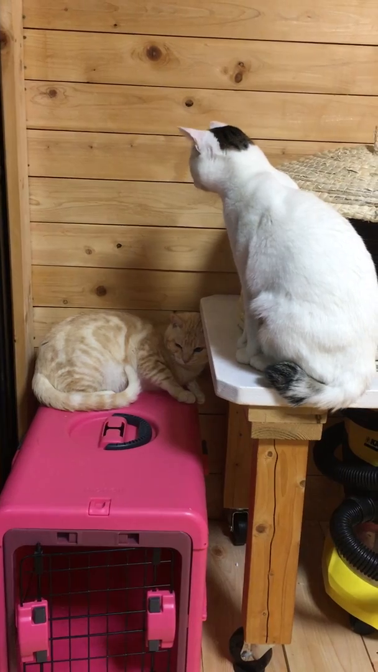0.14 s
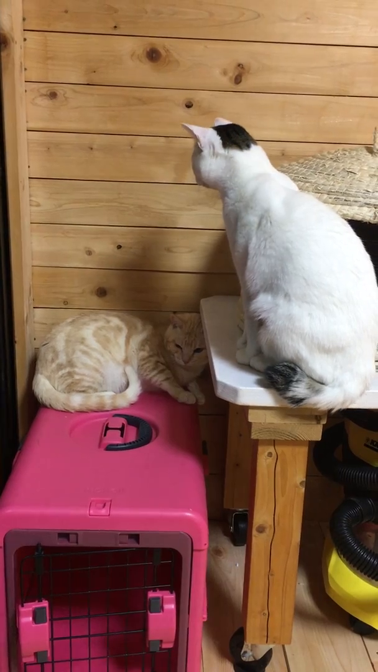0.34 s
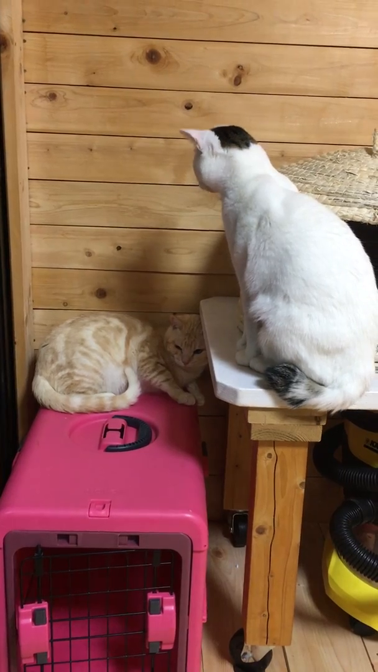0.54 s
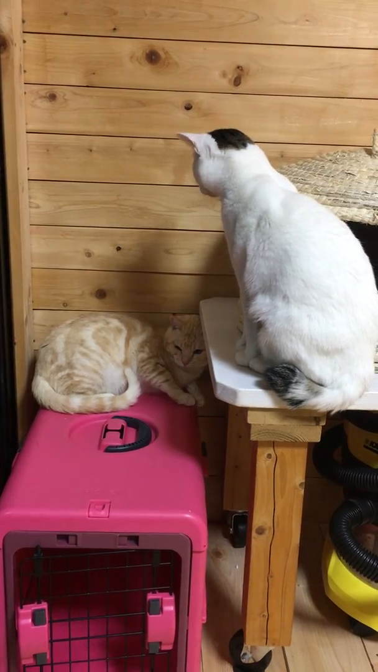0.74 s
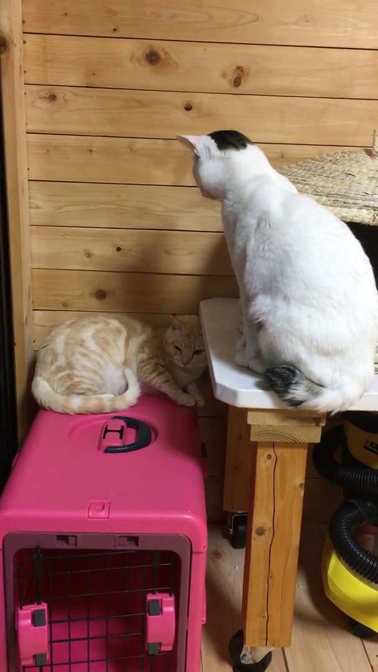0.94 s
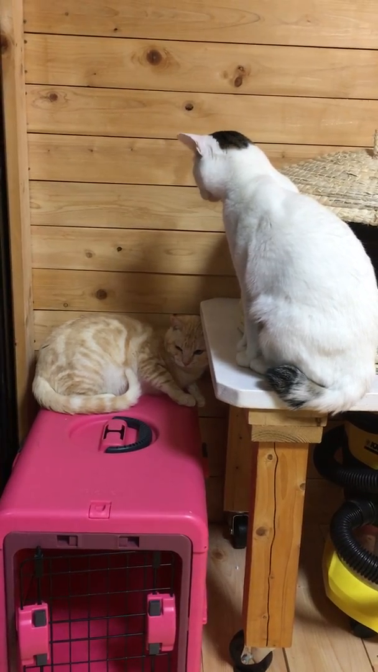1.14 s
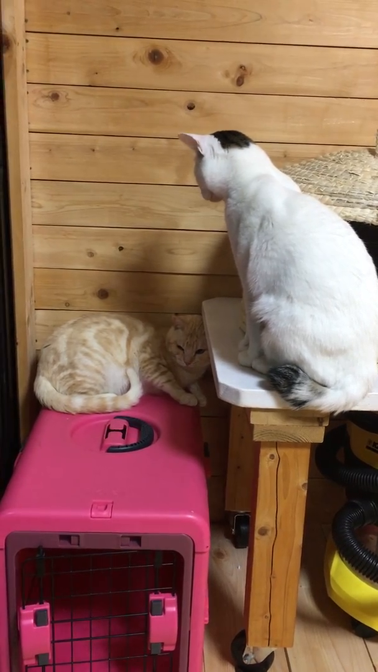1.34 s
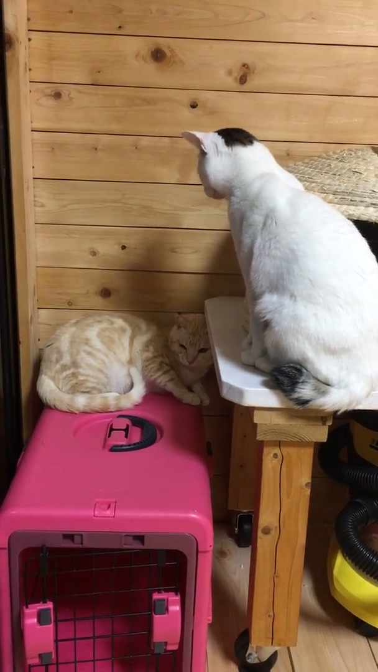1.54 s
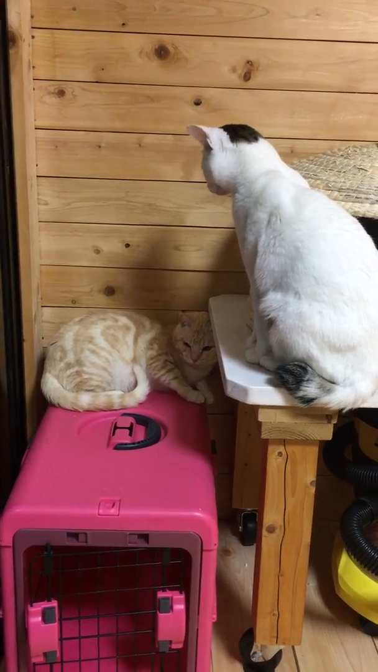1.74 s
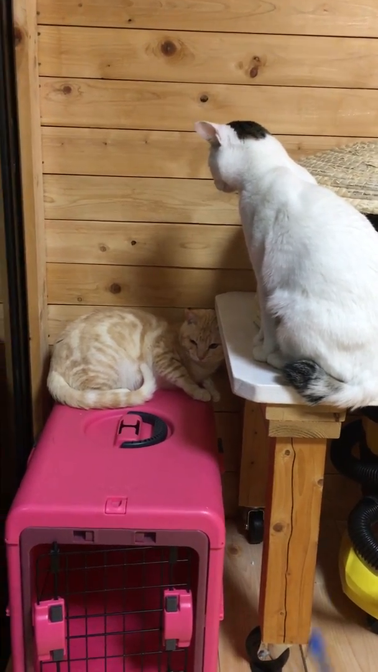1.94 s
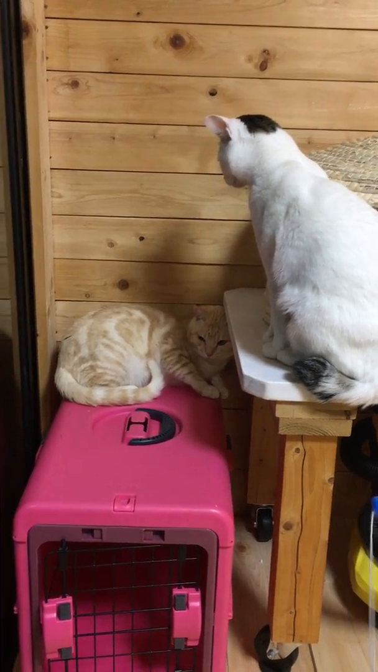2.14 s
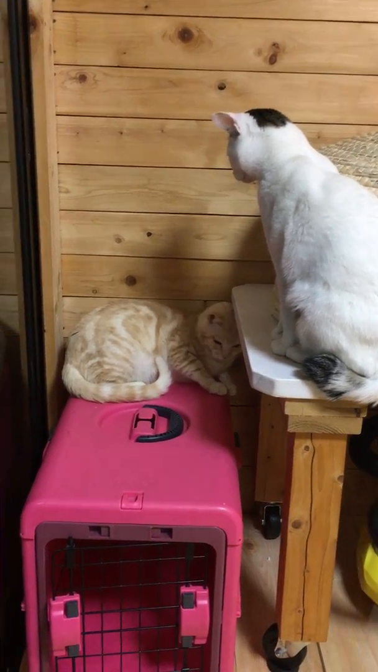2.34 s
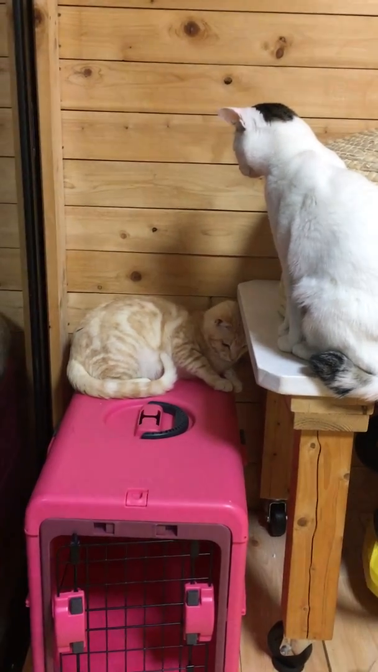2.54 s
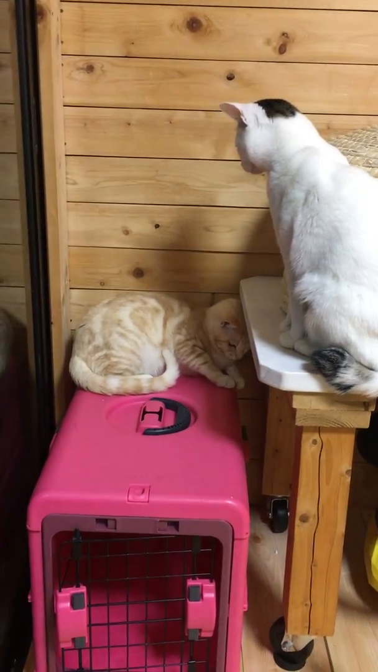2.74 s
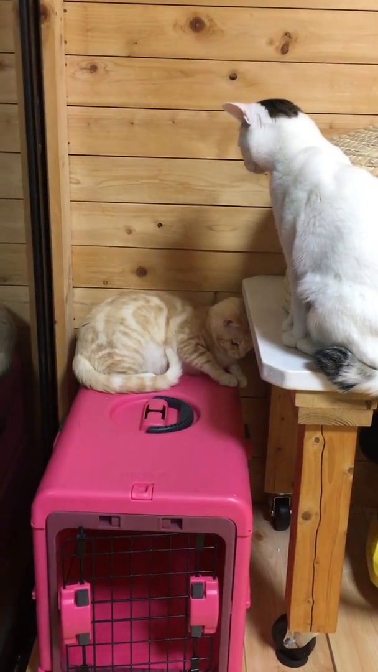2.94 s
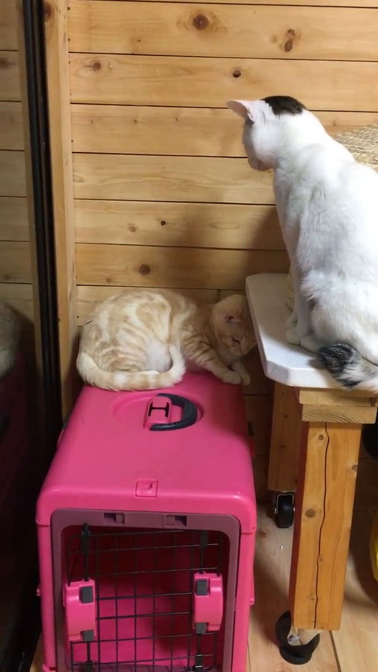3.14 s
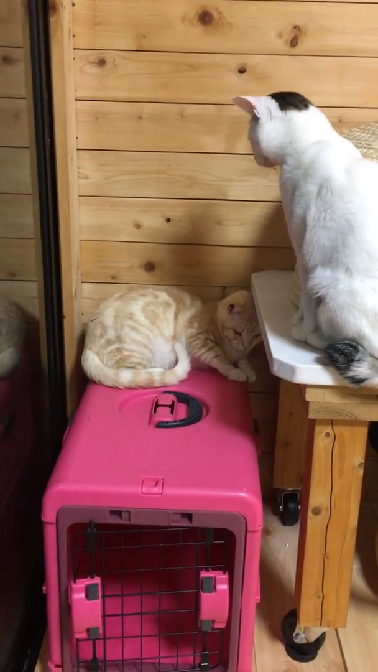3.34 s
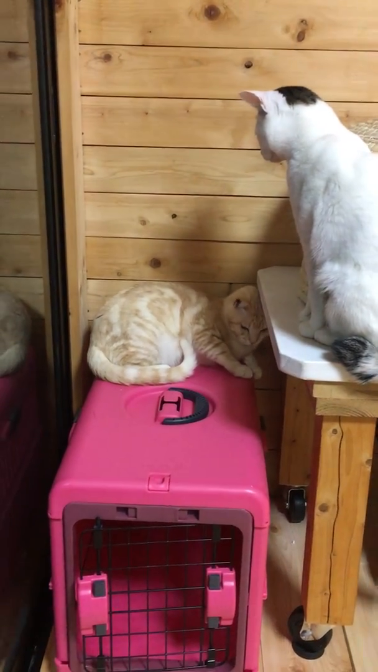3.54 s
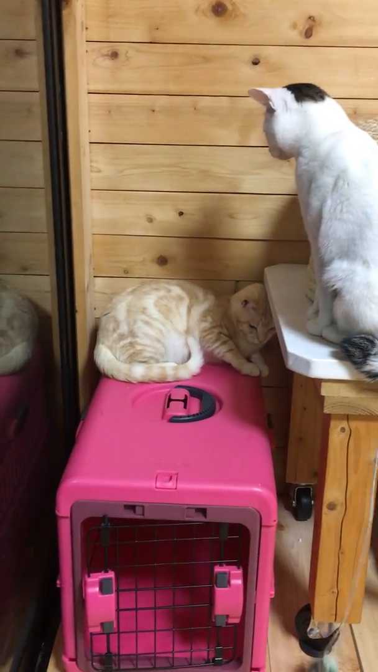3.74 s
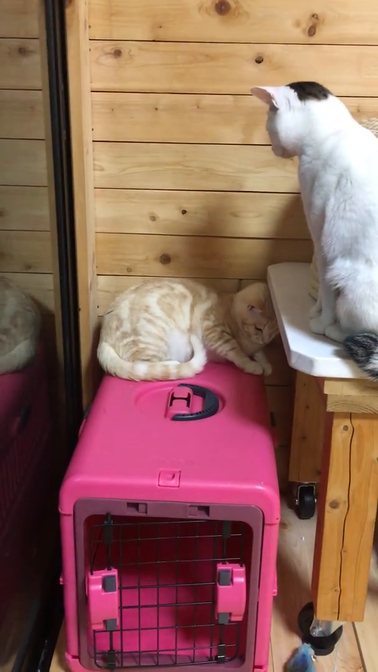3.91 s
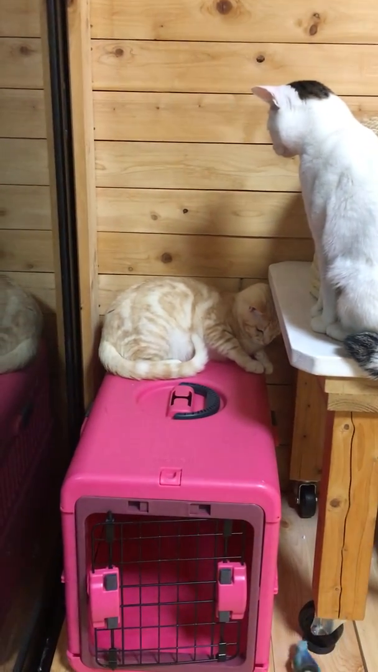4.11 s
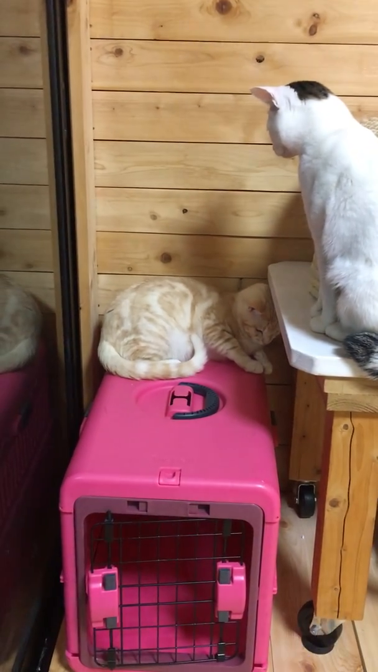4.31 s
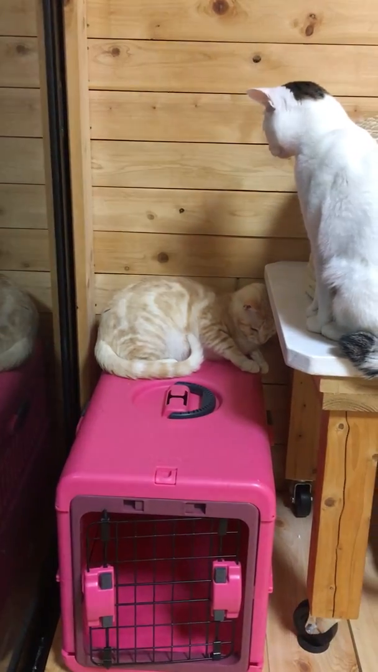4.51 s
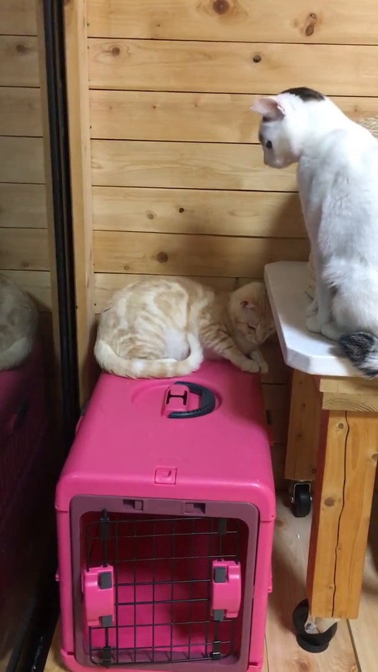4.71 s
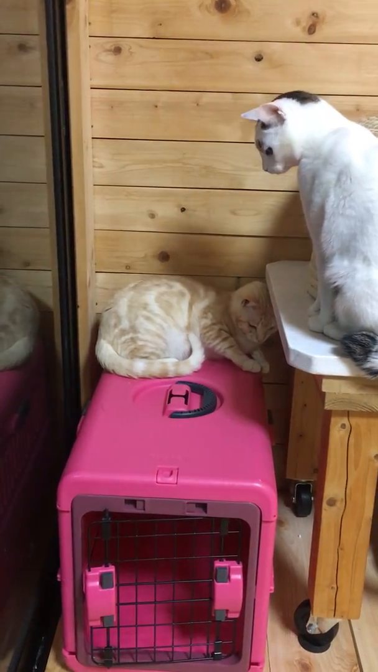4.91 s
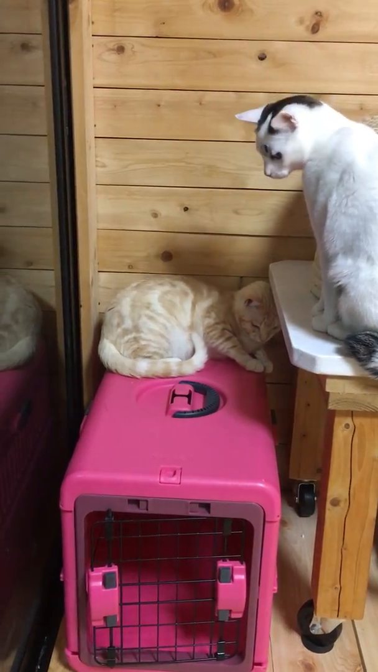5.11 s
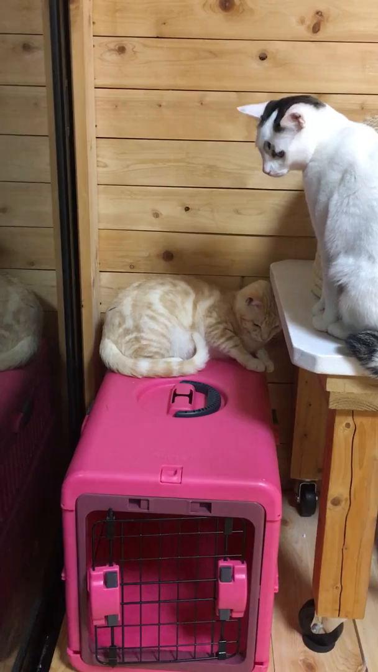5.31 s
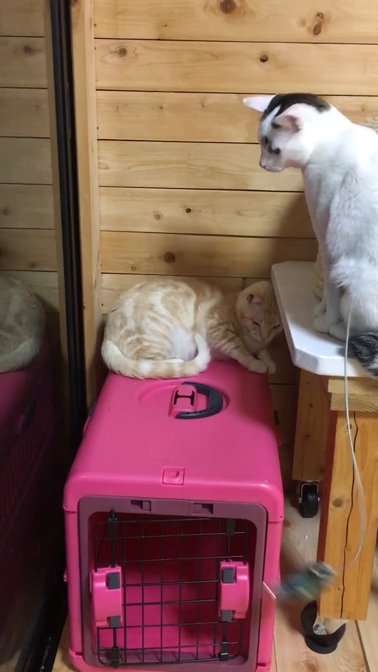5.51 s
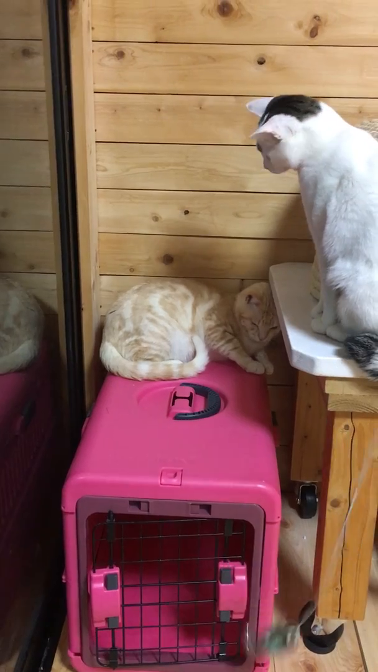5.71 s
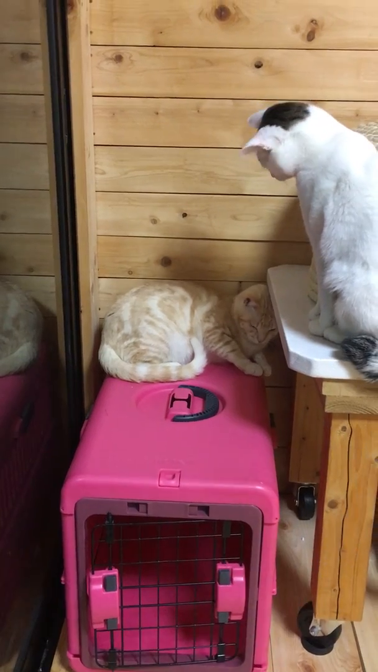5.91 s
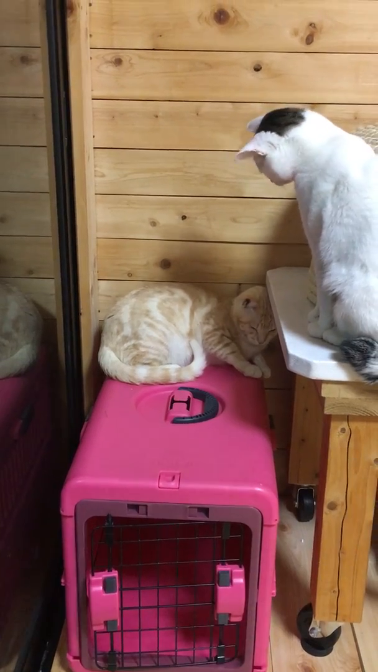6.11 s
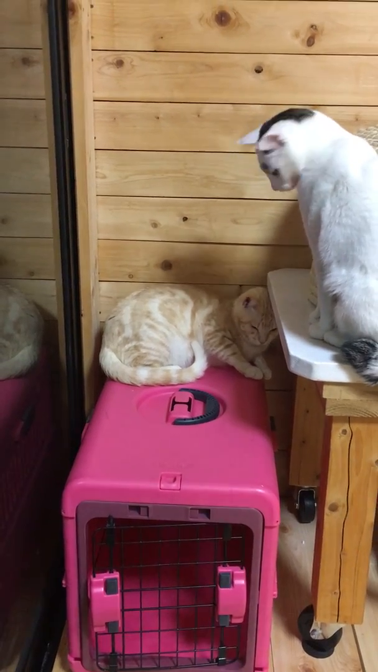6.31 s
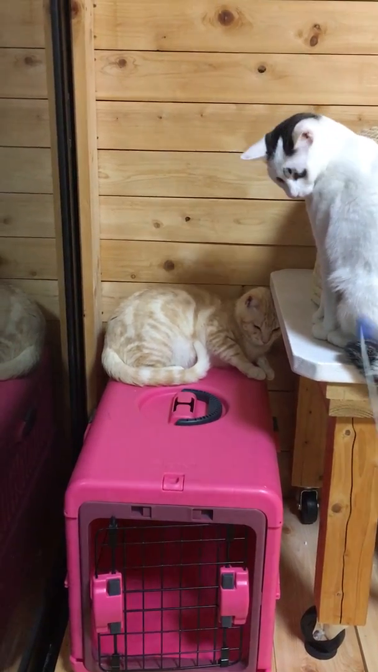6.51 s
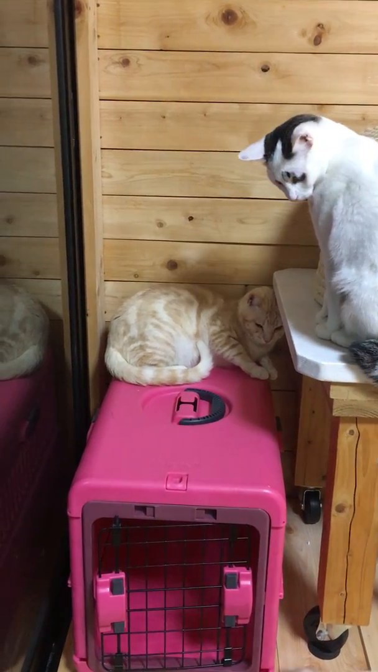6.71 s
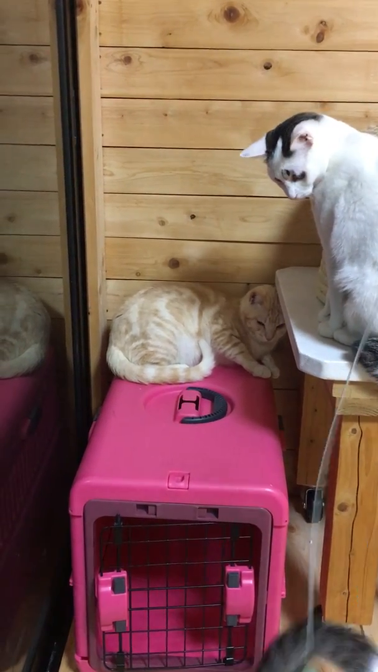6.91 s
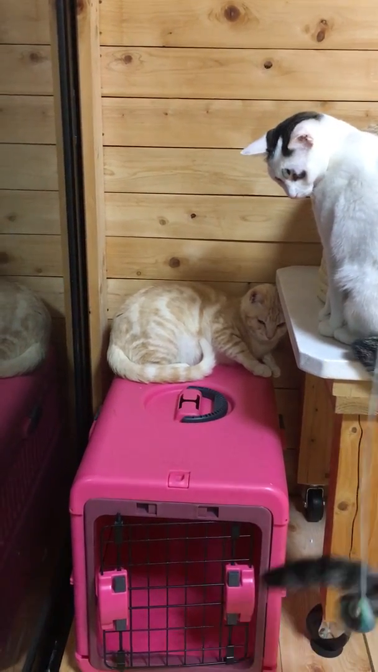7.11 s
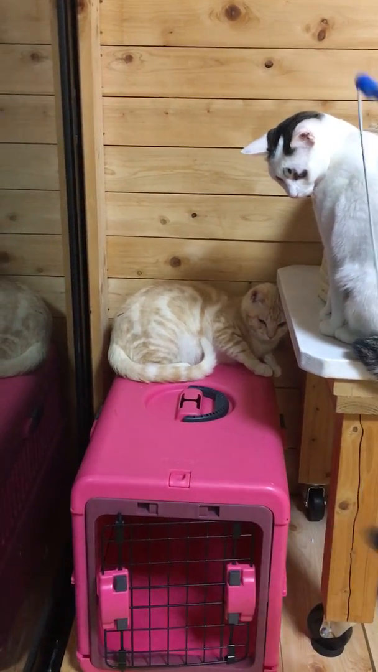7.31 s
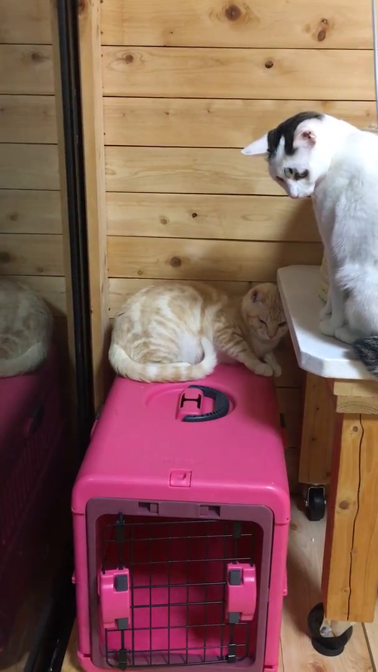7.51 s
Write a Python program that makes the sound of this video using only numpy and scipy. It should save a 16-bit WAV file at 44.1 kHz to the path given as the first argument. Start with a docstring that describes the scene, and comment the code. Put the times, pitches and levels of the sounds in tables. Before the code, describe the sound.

Bright, quickly damped bell rattles and sharp clacks on boards as a cat toy is jerked about indoors, with faint feather rustle, soft thuds and a far engine drone.

```python
"""A wood-panelled room with a low hum, a phone microphone a metre or two from a cat wand.
Far traffic opens the take and swells at about two seconds, as the feathers begin to rustle.
Then the wand is jerked in bouts to the end: a pellet strikes and damps its bell's ringing modes, and the toy
knocks on boards modelled as decaying sines. Soft thuds come near two seconds and again past six,
where a second far engine drones in. Hiss, hum and roar are shaped noise; noise echoes make the room."""
import sys
import numpy as np
from scipy import signal
from scipy.fft import rfft, irfft, next_fast_len
from scipy.io import wavfile
from scipy.ndimage import uniform_filter1d

SR = 44100
rng = np.random.default_rng(int(sys.argv[2]) if len(sys.argv) > 2 else 0)


def generate_wav(signal):
    """Clip the signal to [-1, 1] and save it as 16-bit WAV at the path in sys.argv[1]."""
    frames = np.transpose(np.atleast_2d(signal))
    scaled = np.clip(frames, -1, 1) * 32767
    pcm = np.round(scaled).astype(np.int16)
    wavfile.write(sys.argv[1], SR, pcm)


N = 332955
T = np.arange(N) / SR


def undb(db):
    """Turn decibels into an amplitude factor."""
    return 10 ** (np.asarray(db) / 20)


def unit(x):
    """Scale to an RMS of 1."""
    return x / np.sqrt(np.mean(x ** 2))


def colour(x, points):
    """Weight the spectrum by (pitch_hz, level_db) points, joined along log frequency."""
    hz, db = np.transpose(points)
    size = next_fast_len(len(x))
    f = np.arange(size // 2 + 1) * SR / size + 1  # + 1 keeps the logarithm finite
    gain = undb(np.interp(np.log(f), np.log(hz), db))
    return irfft(rfft(x, size) * gain, size)[:len(x)]


def walk(rate):
    """Smooth random drift of spread 1, with about `rate` new values a second."""
    k = int(SR / rate)
    steps = np.repeat(rng.standard_normal(N // k + 1), k)
    return unit(uniform_filter1d(uniform_filter1d(steps, k), k)[:N])


def add(out, s, x, lead=0):
    """Mix x into out at s seconds, starting `lead` samples early."""
    i = int(s * SR) - lead
    out[i:i + len(x)] += x[:N - i]


def burst(points, fall_s, db):
    """One sharp contact and a scatter of dying chatter after it, coloured, with the given peak."""
    t = T[:4096] - T[64]  # contact at sample 64
    chatter = .7 * rng.standard_normal(4096) * np.exp(-np.abs(t) / fall_s) * (t > 0)
    puff = colour(chatter + (t == 0), points)
    return puff * undb(db) / np.abs(puff).max()


# Hard pellet strikes close to the microphone:
# start_s, low_mode_level_db, upper_modes_level_db, tick_level_db, free_ring_s
STRIKES = [(1.961, -49, -61, -39.5, 0.03), (2.085, -52, -61.5, -54, .047), (2.132, -44, -45, -39, 0.035),
           (2.208, -37.5, -47, -31, 0.028), (2.237, -39, -44, -48, 0.023), (2.255, -37, -44, -55, .032),
           (2.286, -24.5, -50, -18, .03), (2.317, -26.5, -48.5, -54, .036), (2.535, -47, -59, -46, .04),
           (2.553, -43, -58, -53, .022), (2.574, -46.5, -54, -44, 0.024), (2.599, -44.5, -59.5, -54, 0.031),
           (2.661, -47, -54, -40, 0.077), (2.721, -43, -43, -34.5, 0.037), (2.754, -43, -47, -65, 0.049),
           (2.874, -62, -61, -61, 0.019), (2.898, -62, -67, -52, .04), (2.989, -62, -67, -57, 0.03),
           (3.227, -58, -57.5, -50.5, .06), (3.287, -56.5, -68.5, -57, 0.025),
           (3.464, -70.5, -73, -59, .09), (3.556, -27, -52, -18, 0.022), (3.584, -37.5, -44, -52, 0.058),
           (3.635, -31.5, -48, -31, .056), (3.69, -36.5, -53, -45, 0.034), (3.722, -35.5, -51.5, -54, 0.02),
           (3.773, -40.5, -57, -29, .013), (3.785, -34, -54, -25.5, 0.023), (3.803, -46, -50, -49, .09),
           (3.893, -30.5, -64.5, -38, 0.014), (3.937, -37.5, -60, -28.5, 0.024),
           (4.012, -42, -57, -46, 0.053), (4.068, -41.5, -57, -56, 0.033), (4.137, -30.5, -56, -37, 0.025),
           (4.198, -44, -57, -49, 0.025), (4.348, -43, -53.5, -42, 0.037), (4.399, -33, -52, -52, 0.031),
           (4.454, -35.5, -49.5, -49, 0.017), (4.473, -54, -46, -31.5, .014), (4.487, -37, -47, -54, 0.039),
           (4.569, -67, -44.5, -42, 0.019), (4.59, -55, -55, -49, .04), (4.657, -50.5, -60, -57, .07),
           (4.796, -60, -60, -50, .057), (4.852, -48.5, -60, -42.5, 0.042), (4.9, -57, -58.5, -47, 0.055),
           (5.3, -66, -63, -50, .02), (5.319, -61, -61.5, -39, .03), (5.407, -56.5, -54.5, -63, .027),
           (5.671, -39, -38, -14, 0.024), (5.7, -32.5, -39, -20, 0.041), (5.751, -39.5, -42.5, -52, .052),
           (5.846, -41.5, -51, -28.5, 0.022), (5.868, -39, -51, -50.5, 0.019),
           (5.92, -49.5, -57.5, -48, 0.063), (5.975, -53, -60, -41.5, 0.054), (6.083, -59, -67, -49, 0.029),
           (6.771, -72, -74, -57, 0.071), (6.574, -59, -54.5, -48, 0.042), (6.874, -46, -57.5, -42, .03),
           (6.932, -43, -49, -36.5, .027), (7.095, -48.5, -54, -49, .05), (7.172, -58, -65, -51, 0.022),
           (7.453, -54.5, -66, -55, 0.0089)]
# Bouts in which the pellet rolls about while the wand moves:
# start_s, end_s, low_mode_start_level_db, low_mode_end_level_db, upper_modes_relative_level_db
SHAKES = [(1.923, 2.502, -61, -51, -2.5), (2.504, 2.952, -49.5, -72, -7), (2.998, 3.334, -74.5, -68, -6),
          (3.56, 4.241, -46, -55.5, -5), (4.334, 4.658, -55, -54.5, -1), (4.662, 5.0, -60.5, -67.5, -7),
          (5.25, 5.643, -63, -71, -7.5), (5.682, 6.22, -45.5, -80, 1), (6.436, 6.718, -61.5, -70, -2.5),
          (6.879, 7.239, -55.5, -63.5, -2.5), (7.334, 7.537, -67.5, -70, -2.5)]
BRUSHES_PER_S = 40  # candidate light contacts; those in a shake and outside free rings touch
BRUSH_SCATTER_DB, SPLIT_DB = 3, 2  # spread of light contacts, of the two upper modes
BRUSH_TICK_DB = 0.5  # tick above ring
REST_DB = -13  # ring left when a shake ends and the pellet settles, against the end level
CATCH_DB = -5  # the low mode dips when the pellet stops a free ring


def contacts():
    """Pellet motion: hard strikes, the catch ending each free ring, shake edges and random light brushes.

    Rows: start_s, three mode levels_db, tick_level_db, two phase turns per mode; also which rows touch."""
    hard, shake = np.array(STRIKES), np.array(SHAKES)
    n_hard = len(hard)
    count = int(BRUSHES_PER_S * N / SR)
    hard_s = hard[:, 0]
    catch_s = hard_s + hard[:, 4]
    s = np.r_[hard_s, catch_s, shake[:, 0], shake[:, 1], rng.random(count) * N / SR]
    chance = rng.standard_normal((len(s), 11))

    # each contact takes its level from the latest shake to have begun
    bout = np.clip(np.searchsorted(shake[:, 0], s, side="right") - 1, 0, None)
    start, end, db0, db1, upper_db = shake[bout].T
    progress = np.clip((s - start) / (end - start), 0, 1)
    low = db0 + (db1 - db0) * progress + REST_DB * (s >= end) + BRUSH_SCATTER_DB * chance[:, 0]
    upper = low + upper_db + BRUSH_SCATTER_DB * chance[:, 1]
    tick = low + BRUSH_TICK_DB + BRUSH_SCATTER_DB * chance[:, 2]
    low[n_hard:2 * n_hard] += CATCH_DB

    free = ((s[:, None] > hard_s) & (s[:, None] < catch_s)).any(axis=1)
    in_shake = (s > start) & (s < end)
    not_brush = np.arange(len(s)) < len(s) - count
    touch = ~free & (in_shake | not_brush)

    low[:n_hard], upper[:n_hard], tick[:n_hard] = hard[:, 1], hard[:, 2], hard[:, 3]
    touch[:n_hard] = True
    split = SPLIT_DB * chance[:, 3]
    return np.c_[s, low, upper + split, upper - split, tick, chance[:, 5:]], touch


# Shell modes heard at the microphone:
# pitch_hz, t60_s, waver_hz (from the swinging), twin_offset_hz, twin_relative_level_db
BELL = [(3308, .4, 8., 38, -16), (8690, .2, 30., 45, -7), (9378, .2, 34., 55, -7)]
# Flicker as the rolling pellet brushes each mode: spread_db
FLICKER_DB = [2.2, 4.5, 4.5]


def bell(rows):
    """Each pellet contact stops the old ring and leaves a new one; the slit splits every mode
    into a beating pair, and the swinging shell wavers."""
    rows = rows[np.argsort(rows[:, 0])]
    last = np.searchsorted(rows[:, 0], T, side="right") - 1
    since = T - rows[last, 0]
    turn = np.cumsum(0.61 * rows[:, 5:].reshape(-1, 2, len(BELL)), axis=0)  # radians
    hand_over = np.exp(-1 / (0.001 * SR))  # the old ring gives way within a few ms
    out = np.zeros(N)
    for k, (hz, t60, waver_hz, split_hz, twin_db) in enumerate(BELL):
        level_db = rows[last, k + 1] - 60 * since / t60 + FLICKER_DB[k] * walk(120)
        size = undb(level_db) * (last >= 0)  # silent before the first contact
        twin_size = undb(twin_db + 4.4 * walk(33))
        beat = 2 * np.pi * split_hz * np.cumsum(1 + .5 * walk(7.9)) / SR
        twin = twin_size * np.exp(1j * (beat + turn[last, 1, k]))
        swing = size * (np.exp(1j * turn[last, 0, k]) + twin)
        swing = signal.lfilter([1 - hand_over], [1, -hand_over], swing)
        phase = 2 * np.pi * np.cumsum(hz + waver_hz * walk(25)) / SR
        out += (swing * np.exp(1j * phase)).imag
    return out


# Colour of a pellet click close to the microphone: pitch_hz, level_db
TICK = [(500, -54), (1500, -8.5), (2800, -18.5), (4500, 2), (6500, -11), (8000, -22.5), (11500, -20.5),
        (16000, -20)]
# Colour of the lighter bounces: pitch_hz, level_db
BOUNCE = [(1500, -26), (3500, 10.5), (5000, 0), (9000, -22), (13000, -2.5), (16000, -6)]


def ticks(ring, rows, touch):
    """The hard click of each contact, and lighter random bounces while the shell is lively."""
    out = np.zeros(N)
    for s, tick_db, on in zip(rows[:, 0], rows[:, 4], touch):
        # gentle contacts slide, so they last longer
        scuff_s = .001 * undb(np.clip(-30 - tick_db, 0, 30) * 0.8)
        add(out, max(s, .01), on * burst(TICK, scuff_s, tick_db), lead=64)
    memory = np.exp(-1 / (0.027 * SR))  # 27 ms
    lively = np.sqrt(signal.lfilter([1 - memory], [1, -memory], ring ** 2))
    bounce_times = rng.random(N) < 220 / SR  # 220 a second on average
    bounce = bounce_times * rng.standard_normal(N) * lively * undb(2.0)
    return out + colour(bounce, BOUNCE)


# Toy on floor or carrier, in the room with the microphone:
# start_s, peak_level_db, crack_relative_level_db, dullness_db_per_octave (loss above 2 kHz, before limits)
KNOCKS = [(1.9411, -40, -6, 9), (2.2108, -30, 2, 3), (2.26, -41, 1, 8), (2.3343, -34.5, 9.5, 7),
          (2.4747, -41.5, 2, 13), (2.4948, -44.5, 7.5, 12), (2.5358, -34.5, -13.5, 19),
          (3.5562, -23, -3.5, 15), (3.6376, -33.5, 1, 3.5), (3.678, -42, 4, 5), (3.698, -40, 1.5, 2.5),
          (3.782, -42, 0, 7), (3.891, -39, 4.5, 10.5), (3.9345, -35, 3.5, 7), (4.0902, -49.5, 2, -2),
          (4.135, -31.5, -0.5, 4.5), (4.3988, -30.5, 1, 9.5), (4.4613, -38, 4.5, 2.5),
          (4.4814, -40, 5.5, -4), (4.594, -25.5, -2.5, 5.5), (4.7141, -38.5, -7, 12),
          (4.8267, -45, -1.5, 10), (5.2712, -53.5, 7.5, 13), (5.672, -18, 8.5, 0),
          (5.8042, -40.5, 14, -3.5), (6.4171, -57, 9, 4.5)]
# Floor board modes: pitch_hz (before scatter), level_db (relative, before scatter), t60_s
FLOOR = [(605, -22, 0.028), (1082, -9, 0.022), (1202, 12.5, 0.034), (1436, 9, .025), (1580, 18, 0.015),
         (1970, 13.5, 0.028), (2380, -3, .018)]
# Colour of the contact crack before dulling: pitch_hz, level_db
CRACK = [(700, -26), (1300, -3), (2500, -2), (4000, 0), (7000, -6), (11000, -10), (16000, -15)]


def knocks():
    """The toy rings the floor boards as decaying sines and cracks at contact."""
    out, t = np.zeros(N), T[:4000]
    hz, db, t60 = np.transpose(FLOOR)[:, :, None]
    for s, peak_db, crack_db, dull_db in KNOCKS:
        level_scatter, pitch_scatter = rng.standard_normal((2, len(FLOOR), 1))
        size = undb(db + 0.88 * level_scatter - 60 * t / t60)
        ring = (size * np.sin(2 * np.pi * hz * (1 + 0.054 * pitch_scatter) * t)).sum(0)
        add(out, s, ring * undb(peak_db) / np.abs(ring).max())
        slope = np.clip(dull_db, -3, 12)
        crack = [(f, d - slope * max(np.log2(f / 2000), 0)) for f, d in CRACK]
        add(out, s, burst(crack, 0.003, peak_db + crack_db), lead=64)
        # loose parts of the toy clatter on after the blow
        add(out, s, burst(crack, 0.0092, peak_db + crack_db - 12), lead=64)
    return out


# Feathers and string swishing past: start_s, end_s, start_level_db, end_level_db
SWISHES = [(1.66, 1.837, -77, -77), (1.988, 2.75, -71, -68), (3.68, 4.948, -66, -75.5),
           (5.285, 5.664, -66.5, -87), (5.73, 6.267, -58, -68), (6.59, 7.3, -76, -75),
           (7.332, 7.549, -70, -65.5)]
SWISH_EDGE_DB_PER_S = 171  # fade outside each swish
# Colour of the feathers: pitch_hz, level_db
FEATHER = [(1500, -42.5), (3000, 4), (5000, -1), (8000, -3.5), (12000, -4.5), (16000, -11)]


def rustle():
    """Fine crackle of feathers, a little grainier than plain hiss; each swish fades in and out at one rate."""
    grain = rng.standard_normal(N) * undb(2.5 * walk(150) + 1.2 * walk(20))
    size = np.zeros(N)
    for start, end, db0, db1 in SWISHES:
        outside_s = np.maximum(np.maximum(start - T, T - end), 0)
        size += undb(np.interp(T, [start, end], [db0, db1]) - SWISH_EDGE_DB_PER_S * outside_s)
    return unit(colour(grain, FEATHER)) * size


# Soft thuds through the boards: start_s, level_db (before the sine mix), pitch_hz, t60_s
THUDS = [(1.942, -23.5, 118.3, 0.28), (2.108, -21, 95.3, 0.36), (2.219, -24, 70.3, 0.26),
         (2.353, -36, 258, 0.1), (6.193, -33.5, 229.7, 0.089)]


def thuds():
    """Soft low blows: a slow push into a board resonance, roughened by a sine below and one above."""
    out, t = np.zeros(N), T[:20000]
    for s, db, hz, t60 in THUDS:
        ring = sum(np.sin(2 * np.pi * (hz * r * t + rng.random())) for r in (.55, 1, 1.5))
        push = 1 - np.exp(-t / 0.0045)
        add(out, s, 0.25 * ring * undb(db - 60 * t / t60) * push)
    return out


# Colour of the room hum all around the microphone: pitch_hz, level_db (per Hz, relative)
HUM = [(15, -54), (25, -19.5), (53, -5.5), (87, 0.5), (120, -9), (229, -9), (277, -27), (317, -15.5),
       (384, -24.5), (427, -20), (818, -32.5), (1190, -38), (1790, -32.5), (4030, -56.5), (16000, -56.5)]
HUM_DB = -53  # RMS
# Resonant humps in the hum: pitch_hz, width_hz, level_db
HUM_PEAKS = [(50.3, 8.1, -57), (84.2, 5.6, -54.5), (245, 22, -61)]


def room_hum():
    """Broad low noise with a slight drift in level, and narrow bands of noise as resonant humps."""
    out = unit(colour(rng.standard_normal(N), HUM)) * undb(HUM_DB + 0.4 * walk(3.72))
    for hz, width_hz, db in HUM_PEAKS:
        hump = signal.lfilter(*signal.iirpeak(hz, hz / width_hz, SR), rng.standard_normal(N))
        out += undb(db) * unit(hump)
    return out


# Tyre roar of far traffic outside: start_s, level_db
ROAR = [(0, -63.5), (.9, -66.5), (1.6, -59.5), (2.3, -54.5), (2.9, -65.5), (3.6, -76), (7.55, -67.5)]
# Colour of the tyres: pitch_hz, level_db
TYRES = [(150, 2.5), (400, -6.5), (800, -2.5), (1200, -3), (2200, -14), (4000, -37.5)]


def tyre_roar():
    """Far tyres: coloured noise whose level swells and sinks."""
    return unit(colour(rng.standard_normal(N), TYRES)) * undb(np.interp(T, *np.transpose(ROAR)))


# Far engines outside, one list each: start_s, pitch_hz, level_db
ENGINES = [
    [(.9, 158.6, -58.5), (1.4, 158, -53), (1.75, 157, -46.5), (2.2, 154.5, -49), (2.7, 150.1, -54.5),
     (3.0, 148.3, -110)],
    [(6.2, 139.3, -70.5), (6.6, 133.5, -49), (7.0, 126.2, -51.5), (7.55, 124.6, -55)],
]
# Overtones of each engine from the first up: level_db (relative, before drift)
OVERTONES_DB = [
    [0, -11.5, -24],
    [0, -9, -10.5],
]


def engines():
    """Droning engines: gliding harmonics with random drift in phase and level."""
    out = np.zeros(N)
    for rows, overtones_db in zip(ENGINES, OVERTONES_DB):
        s, hz, db = np.transpose(rows)
        size = undb(np.interp(T, s, db, left=-120))
        for k, over_db in enumerate(overtones_db, start=1):
            # higher overtones arrive more smeared
            pitch_hz = k * np.interp(T, s, hz) + 3.44 * k ** 2 * walk(150)
            phase = 2 * np.pi * np.cumsum(pitch_hz) / SR
            out += size * undb(over_db + 3.3 * walk(15)) * np.sin(phase)
    return out


# Decay of the panelled room: pitch_hz, t60_s
ROOM_T60 = [(300, 0.95), (1500, 0.44), (5000, 0.42), (12000, 0.12)]
# Shape of one octave band: ratio_to_centre, level_db
OCTAVE = [(.49, -90), (.5, -30), (.71, -3), (1, 0), (1.41, -3), (2, -30), (2.01, -90)]


def room(x):
    """Dense reflections of panelled walls: noise that dies away octave by octave, strongest at first."""
    t, tail = T[:SR], np.zeros(SR)
    hz, t60 = np.transpose(ROOM_T60)
    for f in 250 * 2. ** np.arange(7):
        band = colour(rng.standard_normal(SR), [(f * r, db) for r, db in OCTAVE])
        tail += band * undb(-60 * t / np.interp(np.log(f), np.log(hz), t60))
    onset = np.clip((t - .001) / 0.0043, 0, 1)
    tail = tail * onset * (1 + 3.3 * np.exp(-t / 0.06))
    return signal.fftconvolve(x, tail / np.sqrt(np.sum(tail ** 2)))[:N]


WALLS_DB, BELL_WALLS_DB = -4, -10.5  # reflected energy against direct sound: clicks and knocks, bell ring


def scene():
    """The bell, clicks and knocks with their reflections, over rustle, thuds, hum and traffic."""
    rows, touch = contacts()
    ring = bell(rows[touch])
    hits = ticks(ring, rows, touch) + knocks()
    wet = room(undb(BELL_WALLS_DB) * ring + undb(WALLS_DB) * hits)
    background = room_hum() + tyre_roar() + engines()
    return (ring + hits + wet + rustle() + thuds() + background)[None]


TOP_HZ = 15800  # upper limit of the phone


def record(dry):
    """The phone drops the deepest bass, below 30 Hz, and cuts the top steeply."""
    dry = signal.sosfilt(signal.butter(4, 30, "high", fs=SR, output="sos"), dry)
    return signal.sosfilt(signal.ellip(10, .2, 60, TOP_HZ, fs=SR, output="sos"), dry)


dry = scene()
out = record(dry)
generate_wav(out)
```